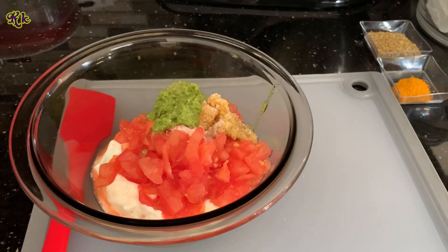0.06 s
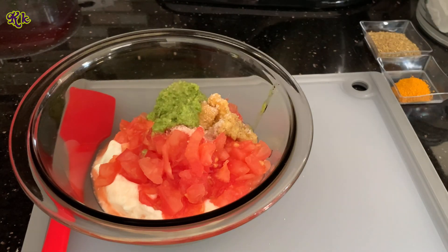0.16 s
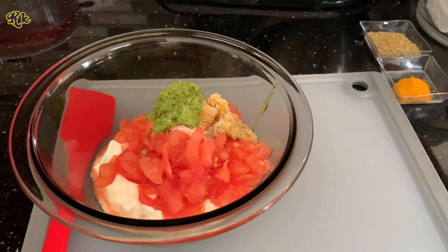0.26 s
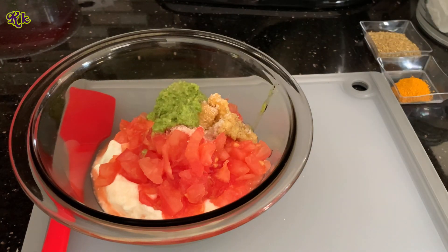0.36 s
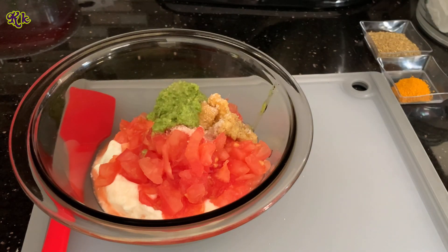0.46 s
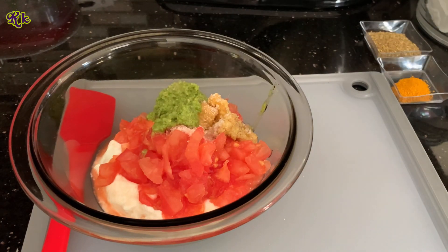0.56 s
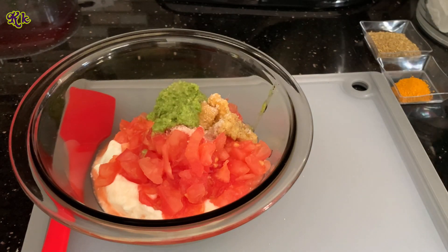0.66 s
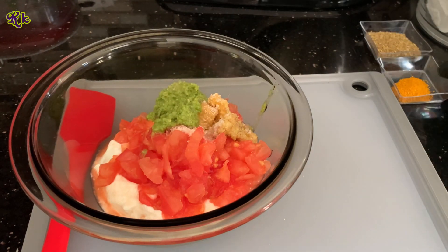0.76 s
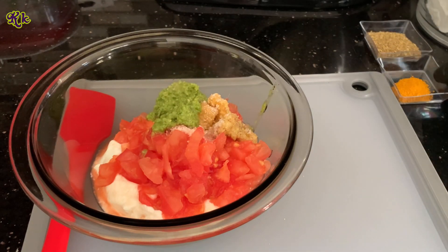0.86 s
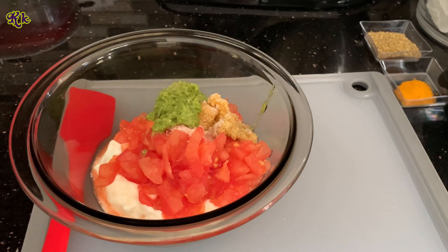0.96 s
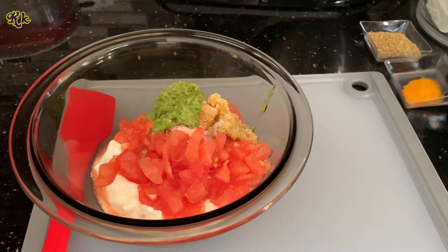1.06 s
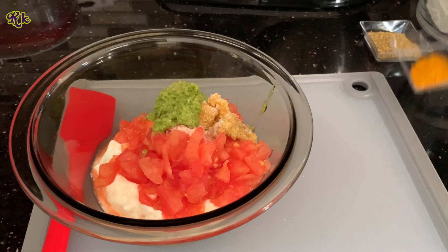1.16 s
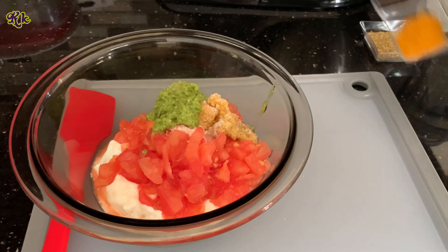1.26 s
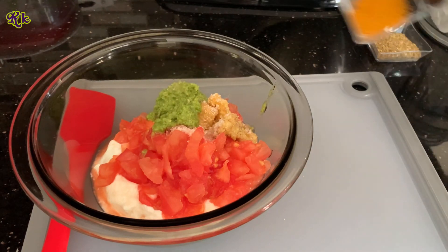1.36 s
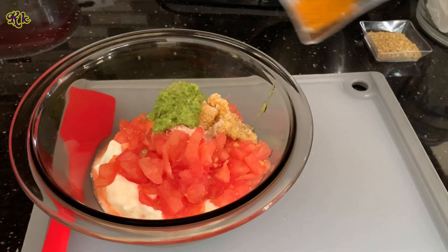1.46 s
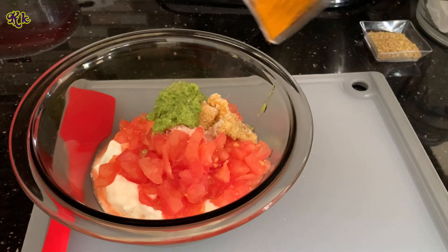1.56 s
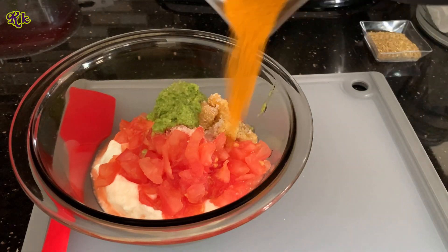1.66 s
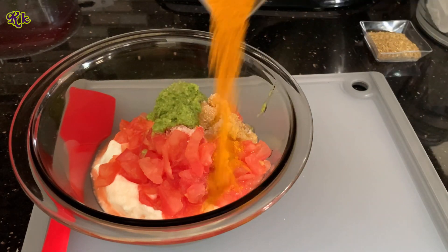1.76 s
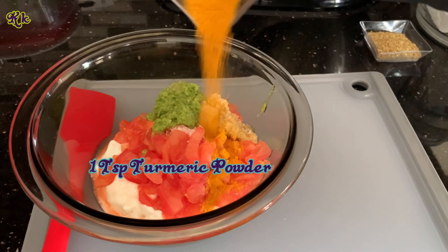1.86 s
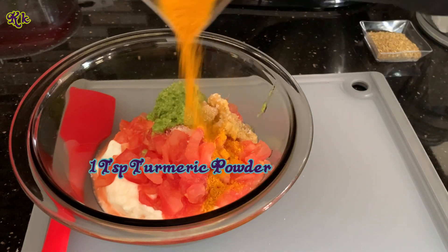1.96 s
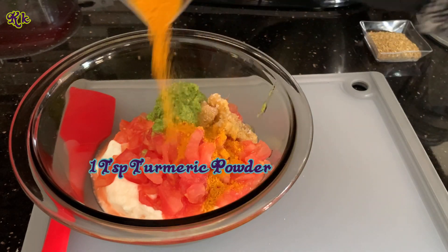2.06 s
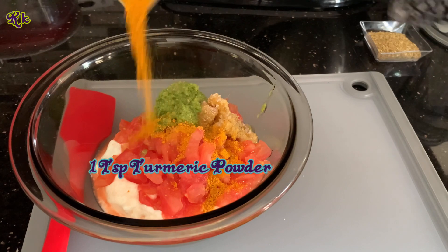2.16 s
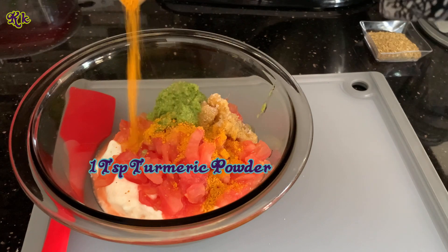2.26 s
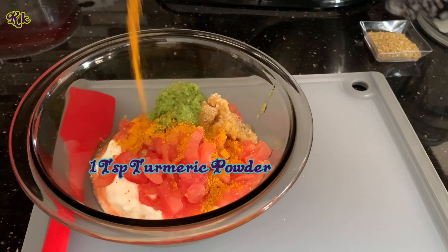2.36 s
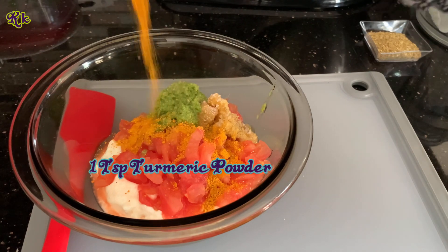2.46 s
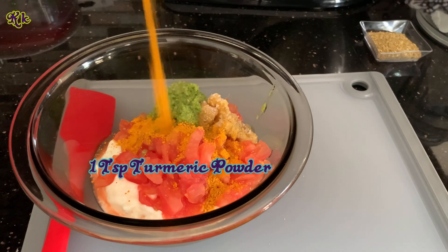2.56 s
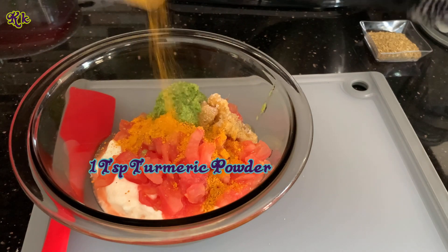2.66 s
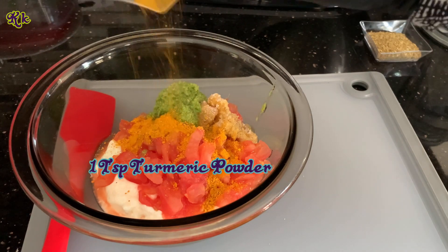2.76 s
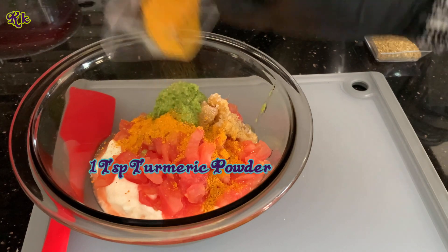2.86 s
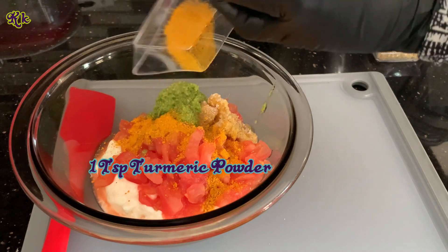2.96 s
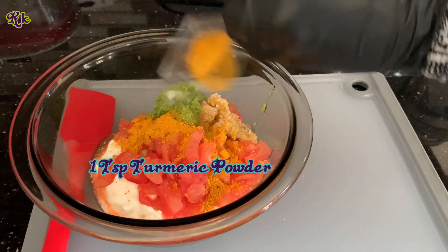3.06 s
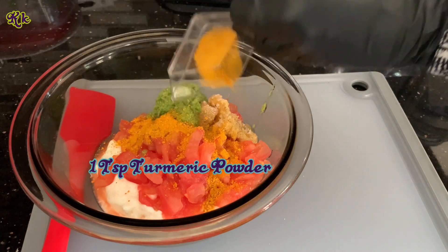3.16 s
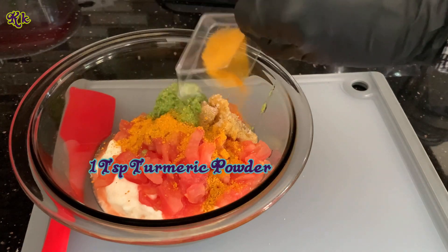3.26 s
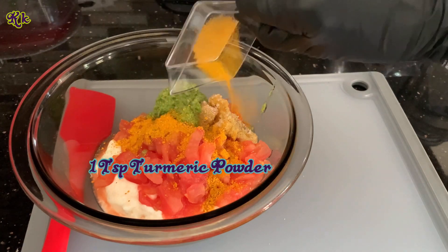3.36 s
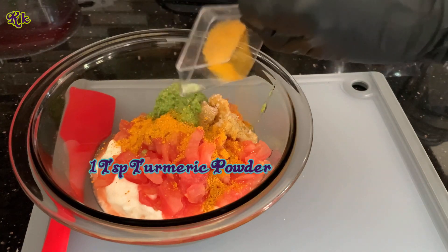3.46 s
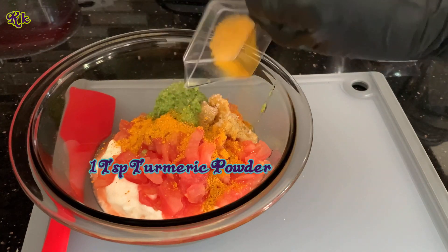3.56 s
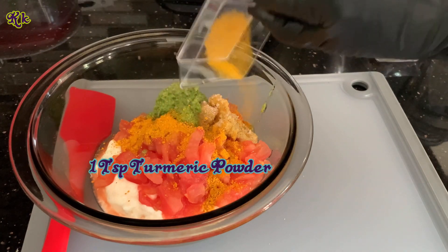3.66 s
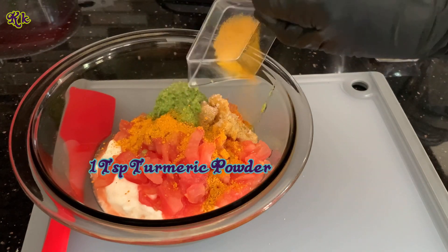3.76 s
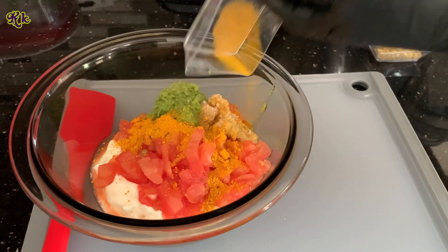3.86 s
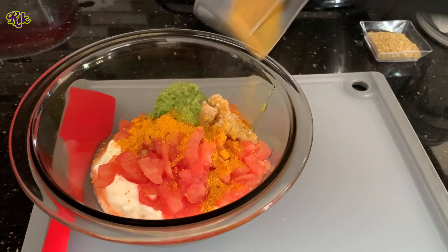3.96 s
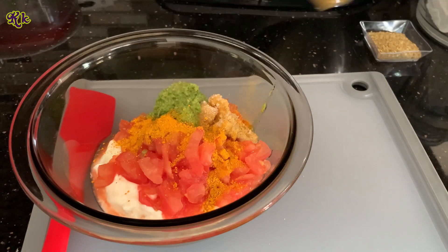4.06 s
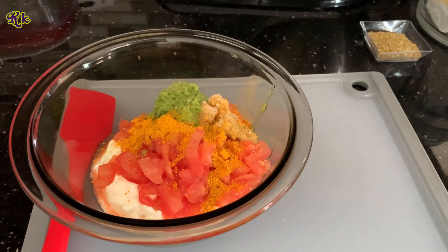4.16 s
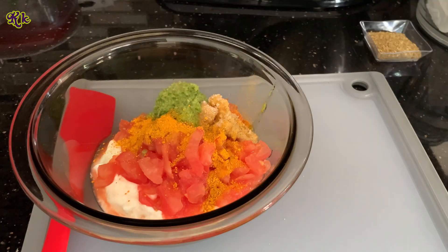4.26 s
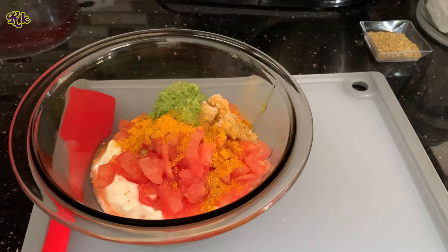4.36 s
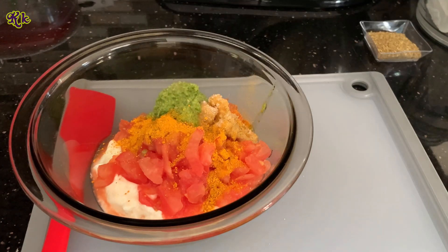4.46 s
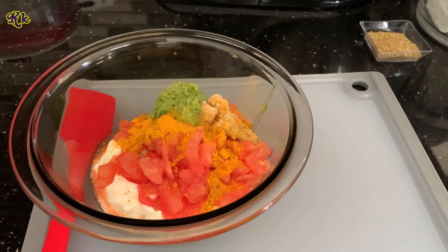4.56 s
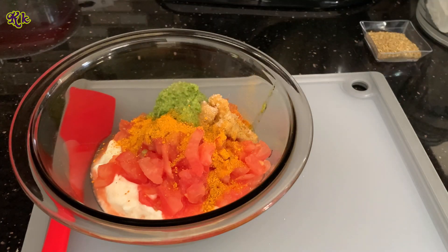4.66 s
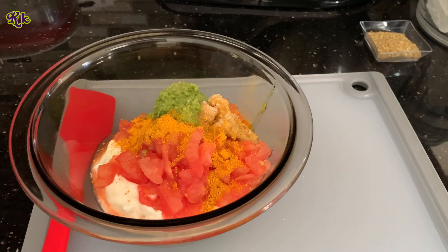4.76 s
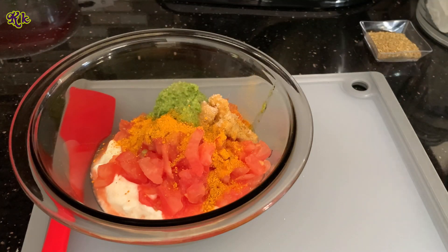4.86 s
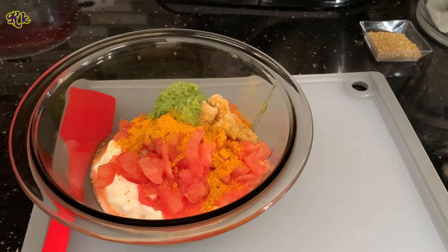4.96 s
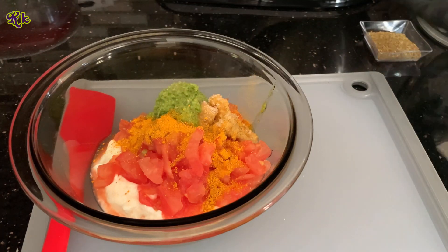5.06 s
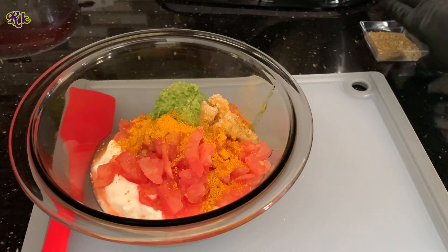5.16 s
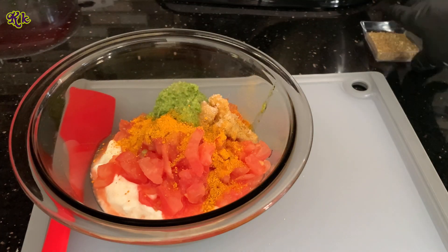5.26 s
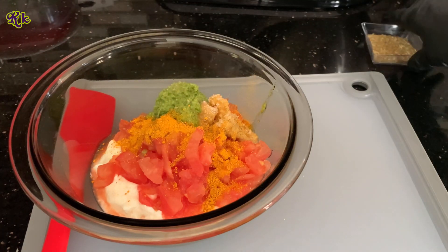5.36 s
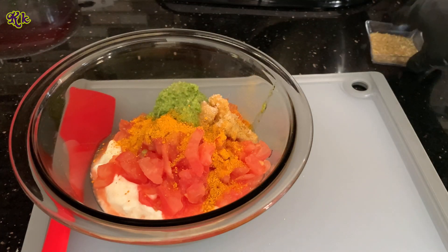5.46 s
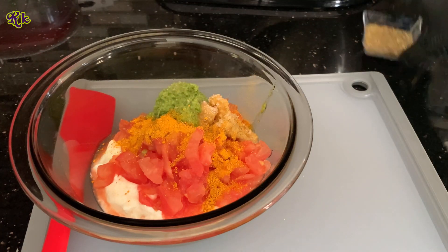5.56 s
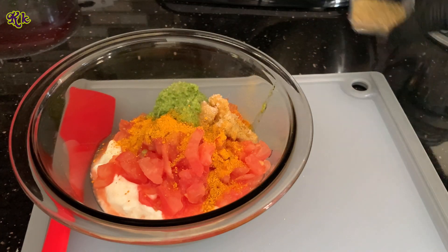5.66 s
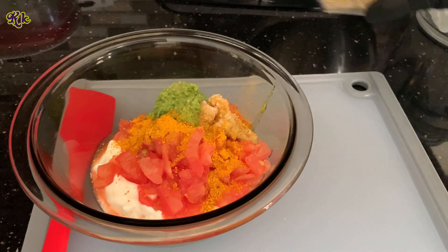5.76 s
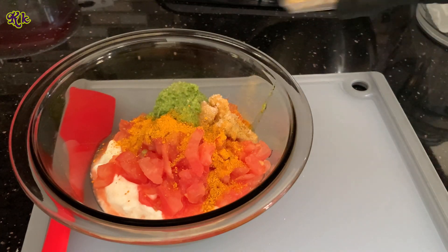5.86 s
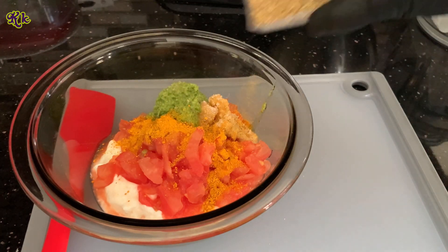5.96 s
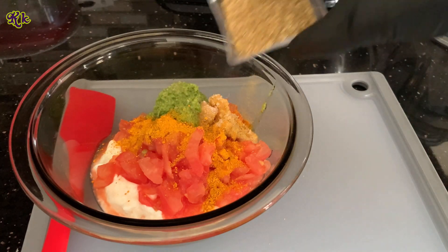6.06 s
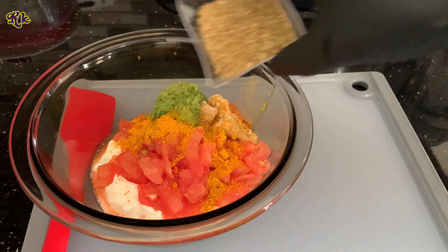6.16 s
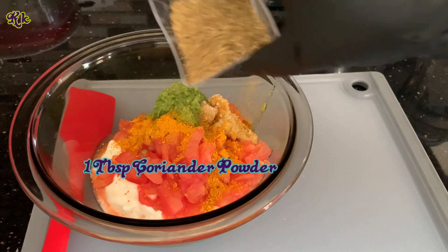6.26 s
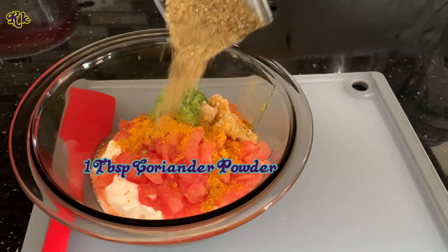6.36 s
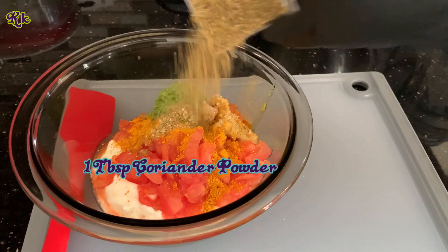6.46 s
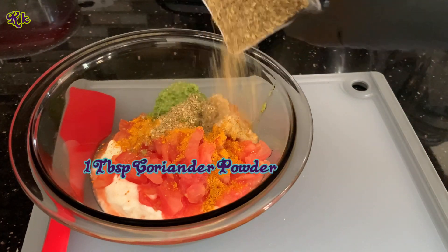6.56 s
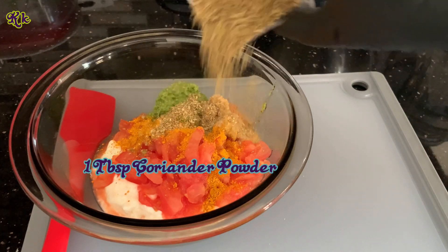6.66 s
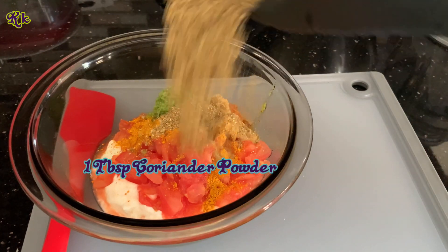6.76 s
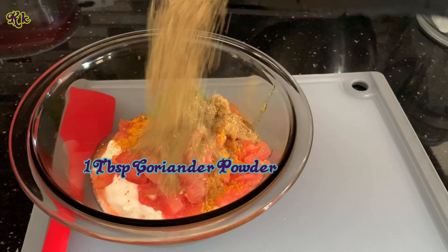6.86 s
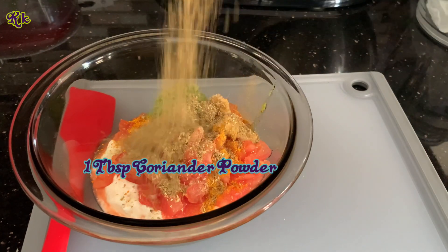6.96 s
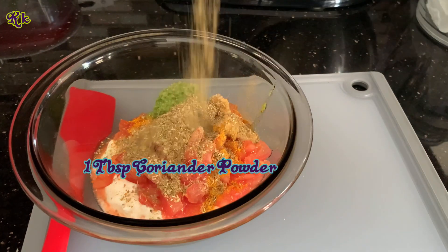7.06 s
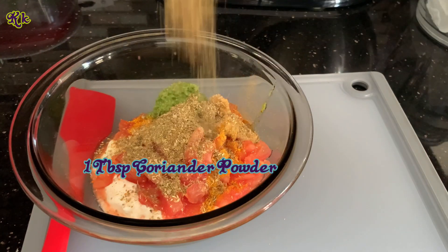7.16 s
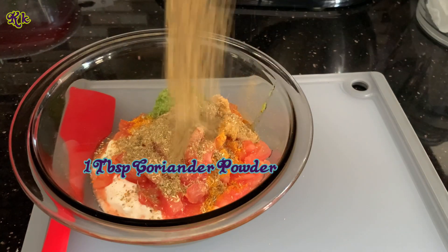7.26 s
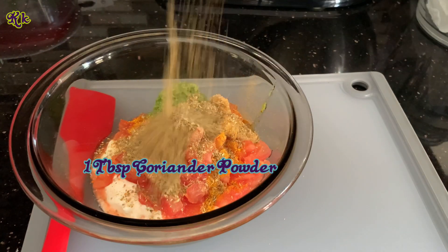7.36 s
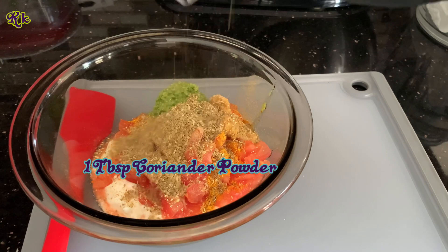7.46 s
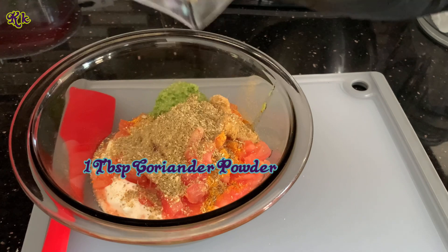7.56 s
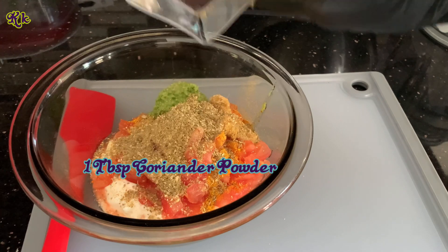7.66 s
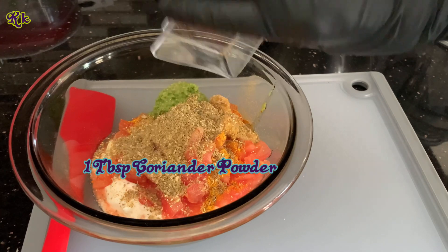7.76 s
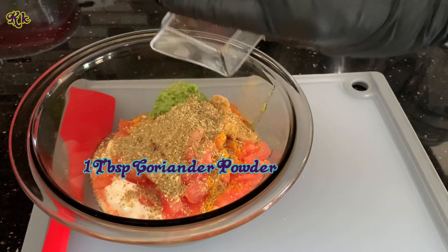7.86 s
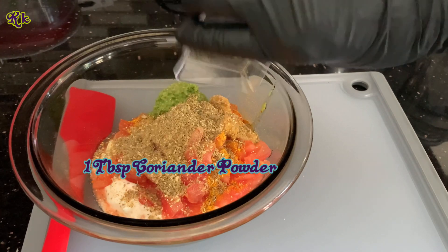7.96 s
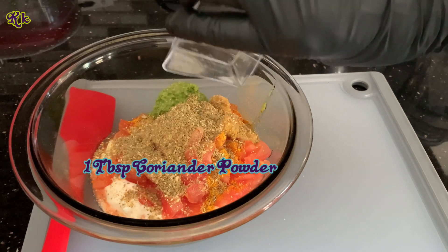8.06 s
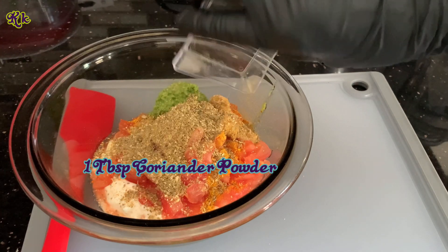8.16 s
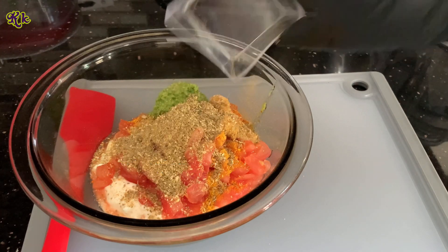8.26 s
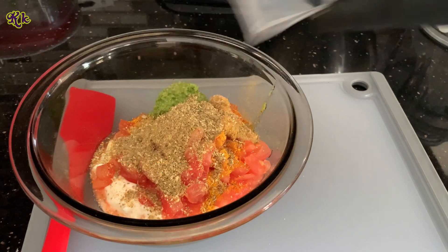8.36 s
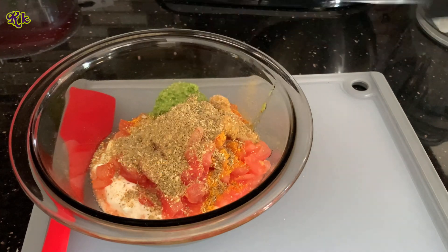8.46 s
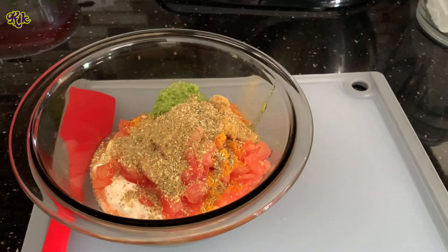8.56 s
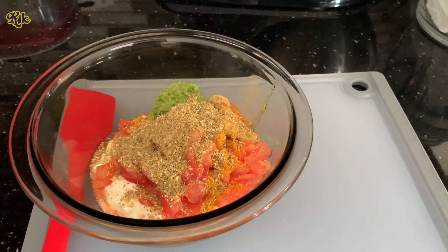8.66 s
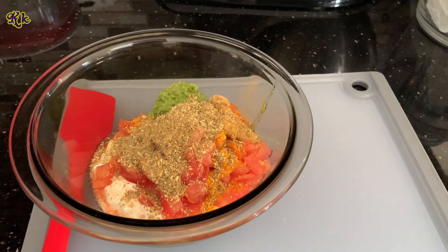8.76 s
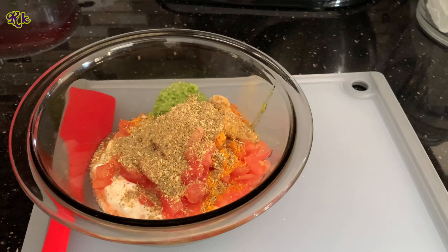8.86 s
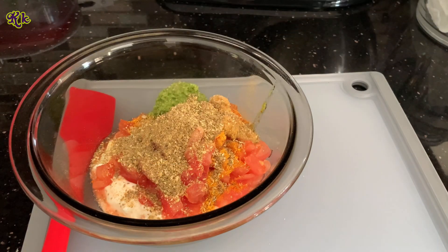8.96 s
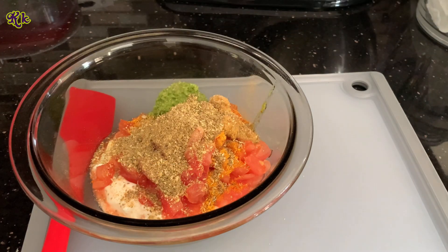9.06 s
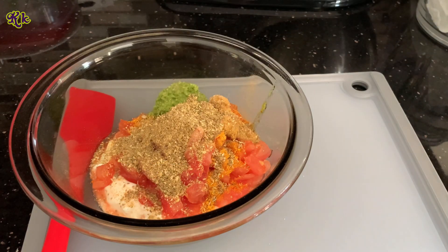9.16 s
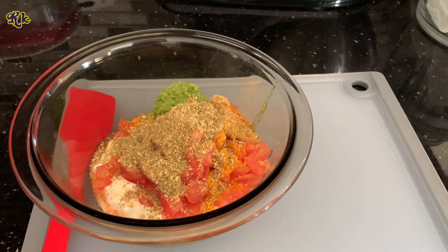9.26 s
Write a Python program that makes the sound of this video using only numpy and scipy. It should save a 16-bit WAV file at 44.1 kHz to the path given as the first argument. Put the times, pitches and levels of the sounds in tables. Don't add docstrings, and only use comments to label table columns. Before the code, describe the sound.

Close kitchen handling: light plastic clicks, bright glass rim taps, hard set-downs on stone and a whisper of poured spice above low appliance hum.

```python
import sys
import numpy as np
from scipy import signal
from scipy.fft import rfft, irfft, next_fast_len
from scipy.io import wavfile
from scipy.ndimage import uniform_filter1d

SR = 44100
rng = np.random.default_rng(int(sys.argv[2]) if len(sys.argv) > 2 else 0)


def file_out(sig):
    cols = np.atleast_2d(sig).T
    lim = np.clip(cols, -1, 1)
    pcm = np.round(lim * 32767).astype(np.int16)
    wavfile.write(sys.argv[1], SR, pcm)


def volts_from_decibels(level):
    exponent = np.asarray(level, float) / 20
    return 10 ** exponent


N = 411012
SIZE = next_fast_len(N, True)
HZ = np.fft.rfftfreq(SIZE, 1 / SR)
COUNTER_LAG, RIM_LAG, KNOCK_LAG = 7, -6, -9


def on_log(table, hz=HZ):
    table = np.array(table)
    return np.interp(np.log(hz + 1), np.log(table[:, 0]), table[:, 1])


def unit(x):
    return x / np.sqrt(np.mean(x ** 2))


def band(x, hz, width):
    return signal.lfilter(*signal.iirpeak(hz, hz / width, fs=SR), x)


def ports(left, right, lag, pan_db):
    late = np.exp(-2j * np.pi * HZ * lag / SR)
    left = rfft(left, SIZE) * late * volts_from_decibels(pan_db / 2)
    right = rfft(right, SIZE) * volts_from_decibels(-pan_db / 2)
    return irfft([left, right], SIZE)[:, :N]


def causal(db):
    cepstrum = irfft(db * np.log(10) / 20)
    cepstrum[1:1024] *= 2
    cepstrum[1025:] = 0
    return np.exp(rfft(cepstrum))


def ringing(modes):
    hz, db, t60, _ = np.transpose(modes)[:, :, None]
    t = np.arange(int(.8 * t60.max() * SR)) / SR
    ring = volts_from_decibels(db - 60 * t / t60) * np.sin(2 * np.pi * hz * t)
    ring[1:] *= np.where(np.abs(hz[1:] / hz[:-1] - 1) < .01, -1, 1)
    return ring


def crack_of(colour, tilt_db, crack_t60, grid, near):
    swell = volts_from_decibels(-21.5 + 2130 * near)
    burst = volts_from_decibels(-60 * near / crack_t60) * np.clip(near / 0.0014, .05, 1)
    force = np.where(near < 0, swell, burst)
    push = rfft(force * rng.standard_normal(len(near)))
    push = irfft(push / np.sqrt(uniform_filter1d(np.abs(push) ** 2, size=32)))
    top_loss = np.where(near < 0, .7, 0.85 * (1 - np.exp(-np.abs(near) / 0.0071)))
    push -= band(push, 11000, 12000) * top_loss
    crack = signal.fftconvolve(push, irfft(causal(on_log(colour, grid) + tilt_db))[:512])
    return crack / np.abs(crack).max()


def contacts(events, colour, modes, lag, pan_db, favour_db=13, brighter=.45):
    lead = 1024
    grid = np.fft.rfftfreq(2048, 1 / SR)
    near = (np.arange(4096) - lead) / SR
    ring = ringing(modes)
    hz, side_db = np.transpose(modes)[[0, 3]]
    out = np.zeros((2, N + SR))
    mean_db = np.mean([row[1] for row in events])
    for s, peak_db, crack_t60, ring_db, favoured_hz in events:
        tilt_db = brighter * (peak_db - mean_db) * np.clip(np.log2((grid + 1) / 3000) / 0.35, 0, 1)
        crack = crack_of(colour, tilt_db, crack_t60, grid, near)
        place_db = favour_db * (np.exp(-(np.log2(hz / favoured_hz) / 0.078) ** 2) - 1)
        for port, side in enumerate((1, -1)):
            start = int(s * SR) + lag * (port == 0)
            gain = volts_from_decibels(peak_db + side * pan_db / 2)
            mode_gain = volts_from_decibels(ring_db + place_db + side * side_db / 2)
            out[port, start:start + ring.shape[1]] += gain * mode_gain @ ring
            out[port, start - lead:start - lead + len(crack)] += gain * crack
    return signal.lfilter(*signal.butter(2, 380, "high", fs=SR), out[:, :N])


# f/Hz, level/dB, t60/s, left minus right/dB
DISH_MODES = [(1360, -4.5, .12, 3), (1805, -10, 0.082, 14.5), (2050, -11.5, 0.089, -16),
              (2560, -11.5, .09, -4), (3170, -17.5, 0.15, 4), (4500, -6, 0.048, 0), (5430, -10.5, 0.096, 7),
              (7050, 0.5, 0.041, 15), (8170, -7, .1, 12), (9800, -10.5, 0.031, 11.5),
              (10530, -10, 0.055, -2)]
# t/s, peak level/dB, crack t60/s, ring level/dB, favoured f/Hz
STACKING = [(.150, -18.5, 0.032, -8, 2050), (.157, -17, 0.02, -13, 2050), (.211, -33.5, 0.14, 6, 4500),
            (.253, -19.5, 0.1, -4, 4500), (.265, -32, .03, -14, 4500), (.292, -29, 0.23, -28, 2050),
            (.3135, -16, 0.04, -3.5, 1810), (.322, -15, 0.09, -39, 2050), (.329, -13.5, 0.024, -12.5, 5550),
            (.339, -16.5, 0.068, -5.5, 2050), (.351, -25.5, 0.049, 6, 1930), (.364, -30.5, .07, 2, 5430)]
# f/Hz, level/dB per Hz
STACK_CRACK = [(180, -67.5), (300, -49), (828, -7), (1040, -13), (1750, 4), (2700, -2.5), (2840, -15),
               (3130, -1.5), (3520, -11.5), (4440, -8), (9710, -6), (11700, -12.5), (14000, -12.5),
               (16000, -34)]


def stack_dishes():
    return contacts(STACKING, STACK_CRACK, DISH_MODES, COUNTER_LAG, -6.5, brighter=0.28)


# f/Hz, level/dB, t60/s, left minus right/dB
BOWL_LIGHT_MODES = [(430, -8, .06, 0), (1600, -8, .04, 0), (1790, -6, .08, 0), (5400, -8, .04, 0),
                    (8800, -16, .08, 0), (1037, -8, 1.1, 3), (1267, -6, .17, 8), (2794, -8, .2, 0),
                    (5112, -10, .21, -5)]
# t/s, peak level/dB, crack t60/s, ring level/dB, favoured f/Hz
RIM_TAPS = [
    (3.083, -27.5, .018, -13.5, 1034),
    (3.085, -40, 0.022, 3, 2794),
    (3.2215, -13.5, .031, -9.5, 1184),
    (3.232, -28, .018, -2, 5112),
]
RIM_RAPS = [
    (3.5495, -12.5, 0.042, -19, 1770),
    (3.560, -24.5, 0.017, -8, 5112),
    (3.738, -13.5, 0.079, -9.5, 1920),
    (3.748, -19, 0.014, -12.5, 1039),
    (3.754, -29.5, .012, -4.5, 2794),
]
# f/Hz, level/dB per Hz
TAP_CRACK = [(120, -86), (200, -17), (491, -5.5), (777, -37), (1180, -3), (2250, -8.5), (3690, -18),
             (4200, -7), (5230, -22.5), (7140, -19), (9750, -10), (11500, -25.5), (12600, -13.5),
             (16000, -17.5)]
RAP_CRACK = [(120, -55.5), (200, -4.5), (448, 0), (749, -42), (950, -15), (1710, 1), (3620, -10),
             (6640, -20.5), (7540, 0.5), (8580, -16), (9580, -1.5), (11300, -9), (12800, -3), (16000, -17)]


def tap_rim():
    taps = contacts(RIM_TAPS, TAP_CRACK, BOWL_LIGHT_MODES, RIM_LAG, 1.0, favour_db=9, brighter=0.36)
    raps = contacts(RIM_RAPS, RAP_CRACK, BOWL_LIGHT_MODES, RIM_LAG, 0.57, favour_db=12.0, brighter=0.64)
    return taps + raps


# f/Hz, level/dB, t60/s, left minus right/dB
JAR_MODES = [(5553, -25, .4, -3), (5582, -28, .8, -2), (5615, -12, .1, -4)]
# t/s, peak level/dB, crack t60/s, ring level/dB, favoured f/Hz
FIRST_TOUCH = [
    (4.562, -12.5, .022, -14.5, 1754),
    (4.567, -37, .03, 6.5, 3130),
    (4.700, -27.5, 0.019, -2, 7050),
    (4.7245, -26.5, .075, 5, 5450),
    (4.737, -37.5, .08, 3.5, 2050),
    (4.752, -28.5, 0.19, 0.5, 2050),
]
SET_DOWN = [
    (4.771, -5, 0.055, -13, 5546),
    (4.780, -19.5, .06, -3.5, 1360),
]
# f/Hz, level/dB per Hz
TOUCH_CRACK = [(290, -63), (500, -39.5), (1140, -27.5), (1740, -2), (2810, -21), (3060, 1), (3540, -24.5),
               (4090, -14), (7980, -21.5), (8700, -22), (11500, -35), (13600, -26.5), (16000, -44.5)]
DOWN_CRACK = [(240, -51), (400, -22.5), (1380, -9), (2120, -17), (2430, -10), (3120, -2.5), (3990, -9.5),
              (5520, -9), (6050, -3.5), (8760, -1.5), (10500, -7.5), (11400, -11.5), (13700, -5.5),
              (16000, -30)]


def set_down():
    touch = contacts(FIRST_TOUCH, TOUCH_CRACK, DISH_MODES, COUNTER_LAG, -7.5, brighter=0.05)
    both_modes = [*DISH_MODES, *JAR_MODES]
    return touch + contacts(SET_DOWN, DOWN_CRACK, both_modes, COUNTER_LAG, -6.0, brighter=.6)


# f/Hz, level/dB, t60/s, left minus right/dB
BOWL_HARD_MODES = [(590, -17, .035, 3), (1630, -8, .04, 0), (2000, -5, .05, -5), (3230, -7, .03, 0),
                   (8060, -24, .08, 0), (10740, -25, .08, 0), (1007, -5, .11, 8), (1047, -7, .08, 8),
                   (1118, -15, .1, 0), (2797, -3.5, .29, 16), (2805, -2, .14, 16), (2813, -8, .13, -16),
                   (5109, -21, .28, -1), (5116, 2.5, .12, -3.5)]
# t/s, peak level/dB, crack t60/s, ring level/dB, favoured f/Hz
RIM_KNOCKS = [
    (7.9454, -8.5, 0.02, -1.03, 1050),
    (8.1182, -7, .025, -1.7, 908),
]
# f/Hz, level/dB per Hz
KNOCK_CRACK = [(150, -73.5), (380, -48.5), (600, -5), (780, -27.5), (1050, -8), (1330, -19.5), (1700, 0),
               (3200, -1), (3900, -16), (4900, -5.5), (5700, -23), (7100, -20.5), (10400, -13.5),
               (15000, -21.5)]


def knock_rim():
    return contacts(RIM_KNOCKS, KNOCK_CRACK, BOWL_HARD_MODES, KNOCK_LAG, -2.1, favour_db=7.0, brighter=2.5)


# t/s, peak level/dB, crack t60/s, ring level/dB, favoured f/Hz
LAST_DISH = [
    (8.9335, -17.5, 0.032, -9, 5430),
    (8.947, -29, 0.035, -2.5, 2560),
    (9.2855, -34, .025, -9, 4500),
]
LAST_DROP = [
    (9.1425, -18.5, 0.06, -8, 1740),
    (9.179, -37, 0.039, -7, 1760),
    (9.205, -41, 0.12, -3.5, 1760),
    (9.225, -39, 0.31, -7, 1760),
]
# t/s, peak level/dB
TICKS = [(.7983, -49.5), (2.5, -58), (5.429, -56), (5.5747, -50), (8.4594, -49.5)]
# f/Hz, level/dB per Hz
LAST_CRACK = [(290, -49), (500, -27.5), (1280, -6.5), (2500, 7), (2890, -3), (3390, 4), (3590, -13.5),
              (4800, -5), (7000, -18.5), (10500, -14.5), (12000, -35.5), (13800, -18.5), (16000, -37)]
DROP_CRACK = [(240, -39), (400, -22.5), (1760, 4.5), (2800, -3.5), (4650, -10.5), (5350, -21.5), (6540, -5),
              (10100, -10.5), (11600, -14), (14100, -11), (16000, -50)]


def last_dishes():
    last = contacts(LAST_DISH, LAST_CRACK, DISH_MODES, COUNTER_LAG, -5, brighter=0.82)
    drop = contacts(LAST_DROP, DROP_CRACK, DISH_MODES, COUNTER_LAG, -2.5, brighter=0.35)
    crack_t60_s, ring_db, favoured_hz = 0.05, -21, 2050
    ticks = [(s, db, crack_t60_s, ring_db, favoured_hz) for s, db in TICKS]
    return last + drop + contacts(ticks, DROP_CRACK, DISH_MODES, COUNTER_LAG, 0.0, brighter=.1)


# f/Hz, t60/s, level/dB
ROOM = [(482, 0.279, -19), (1000, 0.053, -13.5), (2123, 0.81, -15.5), (4000, 0.63, -19), (7000, 0.63, -24),
        (9970, .17, -23), (14000, .1, -30)]


def kitchen(x):
    t = np.arange(SR) / SR
    tail = np.zeros((2, SR))
    for hz, t60, db in ROOM:
        width = min(2.87 * hz, 16000)
        echoes = band(band(rng.standard_normal((2, SR)), hz, width), hz, width)
        tail += volts_from_decibels(db - 60 * t / t60) * echoes / np.sqrt(hz * t60)
    tail *= 0.87 * np.minimum(t / 0.002, 1)
    return signal.fftconvolve(x, tail, axes=1)[:, :N]


# t/s, level/dB, length/s
RUSTLES = [(0.802, -69.5, 0.12), (1.698, -78, .03), (2.24, -73, .05), (2.411, -74, .04), (2.49, -74, .03),
           (2.703, -72, .03), (3.074, -63.5, .02), (3.116, -69.5, .02), (5.70, -78, .03), (5.89, -78, .03),
           (6.09, -73, .04), (6.296, -72, 0.085), (7.62, -76, .015)]


def whisper():
    t = np.arange(N) / SR
    flow = np.interp(t, [6.45, 6.82, 7.32, 7.4], [0, 1, volts_from_decibels(5), 0]) * volts_from_decibels(-80)
    rise_s, fall_db = .012, 12
    for s, db, length in RUSTLES:
        rise = np.clip(1 + (t - s) / rise_s, 0, 1)
        flow += rise * volts_from_decibels(db - fall_db * np.clip(t - s, 0, 1) / length)
    grains = rng.standard_normal(N) * volts_from_decibels(2.82 * np.minimum(rng.exponential(size=N), 5))
    hiss = unit(band(grains, 11060, 9000) + .3 * band(grains, 4000, 4000)) * flow
    return np.array([hiss, hiss])


def motor(turn_hz, body, uneven_db, airy):
    turns = np.cumsum(1 + .0002 * rng.standard_normal(N // 500)) * SR / turn_hz
    turns = turns[turns < N].astype(int)
    knocks = np.zeros(N)
    knocks[turns] = volts_from_decibels(uneven_db * rng.standard_normal(N // 500)[:len(turns)])
    rattle = knocks + airy * rng.standard_normal(N)
    buzz = np.zeros(N)
    for hz, width, db in body:
        buzz += volts_from_decibels(db) * unit(band(band(rattle, hz, width), hz, width))
    return ports(buzz, buzz, -18.5, -1.6)


# f/Hz, width/Hz, level/dB
CABINET = [(1050, 150, -79.5), (1289, 150, -76), (1560, 100, -81.5), (2050, 300, -77.5), (2497, 710, -93),
           (3040, 260, -81.5), (3150, 210, -81.5), (4000, 200, -75.5), (5400, 300, -88.5), (5600, 300, -85)]
# f/Hz, width/Hz, level/dB
HOUSING = [(60, 27, -65.5), (203.05, 12, -62.5), (338.7, 70, -70), (451.6, 194, -68), (591.6, 28, -76)]


def fridge():
    compressor = motor(58.885, CABINET, uneven_db=-1.0, airy=0.0079)
    fan = motor(59.19, HOUSING, uneven_db=4.5, airy=0.018)
    return compressor + fan


# f/Hz, likeness 0-1
LIKENESS = [(60, 0.98), (300, 0.7), (700, 0.4), (1500, 0), (4000, 0.4)]
# f/Hz, left minus right/dB
AIR_PAN = [(60, -1), (110, -3.5), (200, -3), (380, -3), (700, 0), (1290, 2), (2380, 2.5), (4400, -2.5),
           (8120, -3), (15000, -8)]


def air(colour, level_db):
    like = np.clip(on_log(LIKENESS), 0, 1)
    mid, side = rfft(rng.standard_normal((2, SIZE))) * volts_from_decibels(on_log(colour))
    mid, side = irfft([mid * np.sqrt(1 + like), side * np.sqrt(1 - like)], SIZE)
    lag = -19 * np.clip((HZ - 150) / 400, 0, 1)
    return volts_from_decibels(level_db) * unit(ports(mid + side, mid - side, lag, on_log(AIR_PAN)))


# f/Hz, level/dB per Hz
RUMBLE = [(12, -56.5), (20, -16), (71, 0), (129, -1.5), (171, -13.5), (207, 1), (236, -9.5), (439, -10.5),
          (473, -12), (560, -21), (604, -24.5), (949, -25.5), (1280, -23), (1800, -43.5), (2340, -75.5),
          (3960, -120)]
HISS = [(1000, -30.5), (1700, 0.5), (2100, 1.5), (4100, 2), (5000, 0.5), (6700, 1), (7600, -6),
        (10500, -15), (15500, -18), (15900, -45)]


def room_air():
    return air(RUMBLE, -52.5) + air(HISS, -66.5)


def scene():
    hits = stack_dishes() + tap_rim() + set_down() + knock_rim() + last_dishes()
    return hits + kitchen(hits) + whisper() + fridge() + room_air()


def low_pass(x):
    return signal.sosfilt(signal.butter(12, 17010, fs=SR, output="sos"), x)


def record(dry):
    shared_hz, lag, top_hz = 7420, 9.47, 16900
    left, right = rfft(dry, SIZE)
    shared = 1 / (1 + (shared_hz / (HZ + 1)) ** 16)
    late = np.exp(-2j * np.pi * HZ * lag / SR)
    left = (1 - shared) * left + shared * right * volts_from_decibels(1.23) * late
    mix = irfft([left, right] * (HZ < top_hz), SIZE)[:, :N]
    return low_pass(mix)


dry = scene()
out = record(dry)
file_out(out)
```